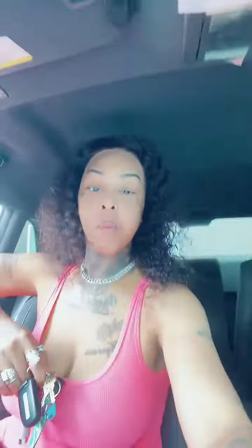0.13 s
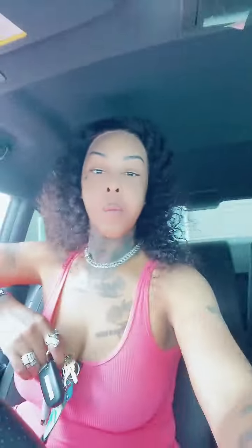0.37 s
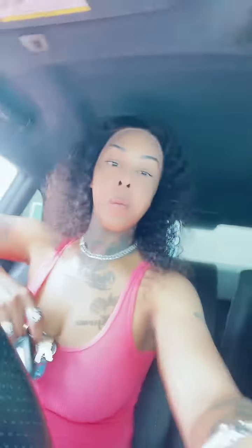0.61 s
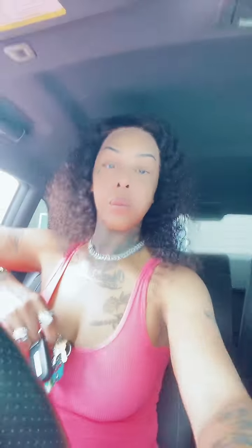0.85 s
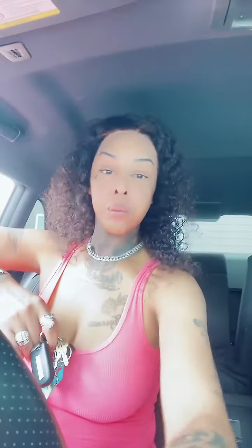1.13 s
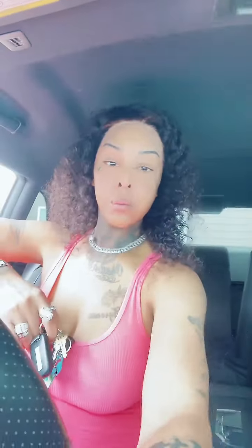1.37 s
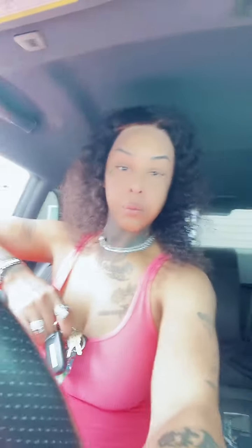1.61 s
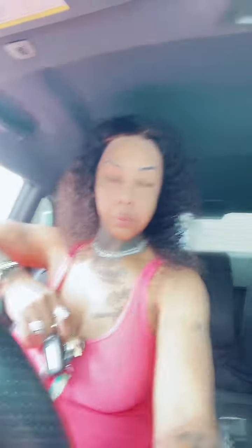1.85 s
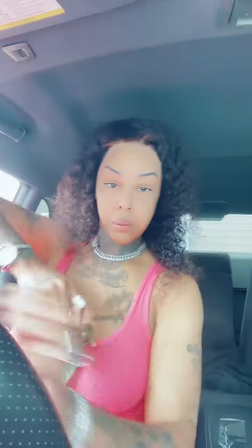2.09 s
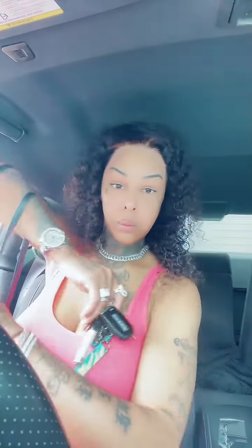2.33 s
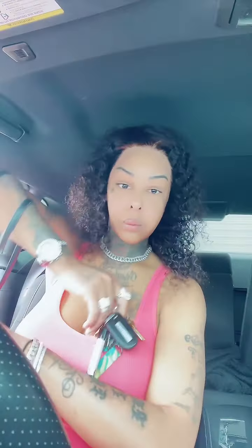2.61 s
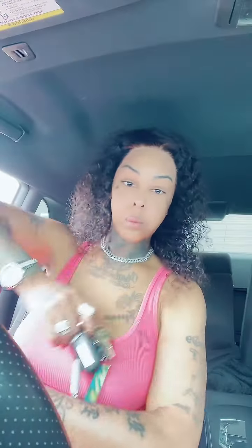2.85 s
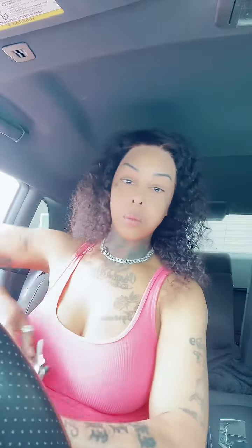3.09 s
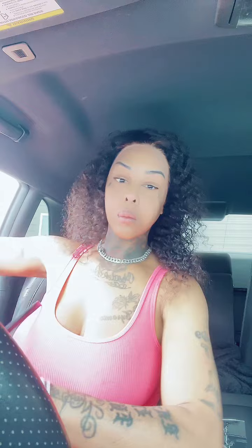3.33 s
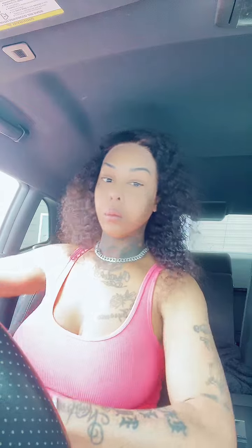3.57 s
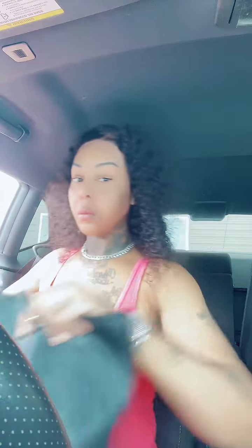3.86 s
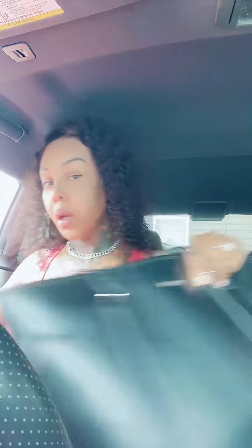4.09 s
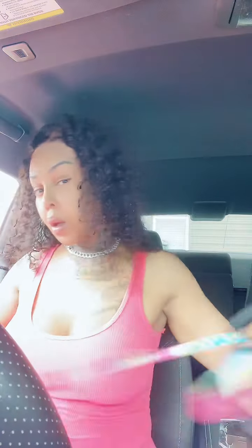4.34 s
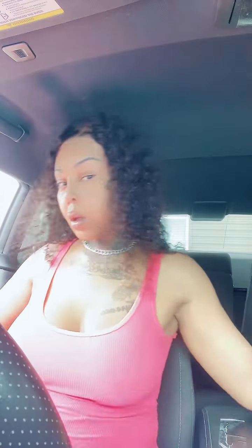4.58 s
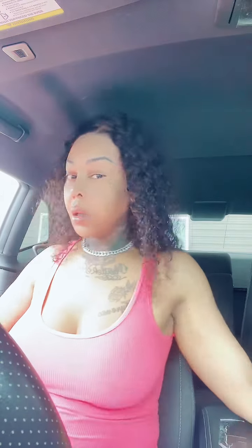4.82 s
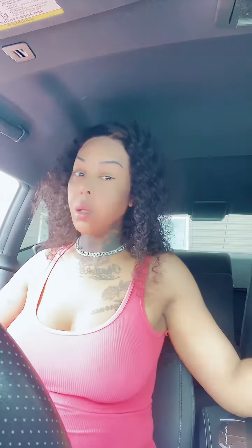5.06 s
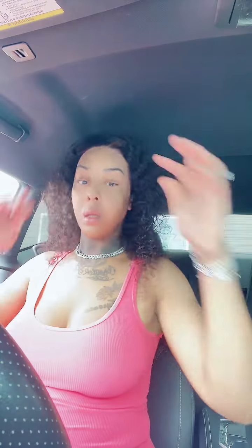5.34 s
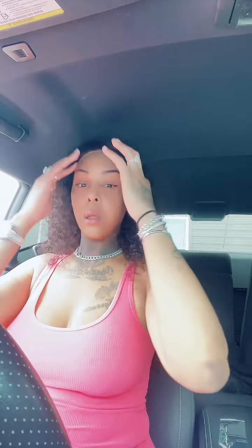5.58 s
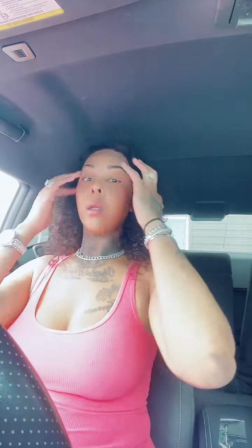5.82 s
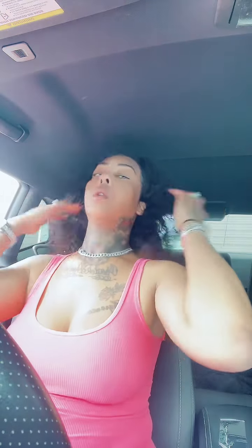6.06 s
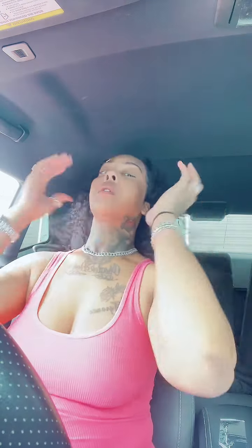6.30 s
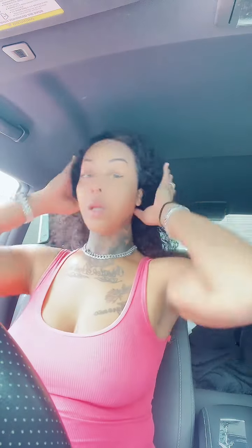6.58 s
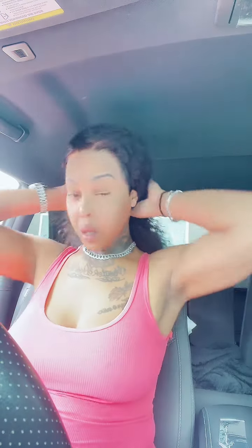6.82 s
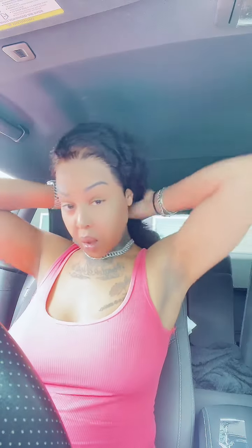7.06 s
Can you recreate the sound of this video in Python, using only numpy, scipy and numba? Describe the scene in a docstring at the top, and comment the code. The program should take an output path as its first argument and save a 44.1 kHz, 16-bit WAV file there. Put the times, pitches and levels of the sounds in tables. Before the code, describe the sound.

A close, rough phone microphone in a small closed cabin: gritty skin-on-plastic scraping with short squeaks, then sharp cracks and dull thumps, a short pause, and a second group of clicks as the phone is seated. Over a low boomy hum and faint hiss, small metal keys and bracelets tinkle, cloth and bag rustle, the jangling peaks with a soft thump, then thins to near quiet.

```python
"""Phone pushed into a car holder

Under it all lie the low drone of a parked car's cabin and microphone hiss: shaped noise and booming modes.
Fingers rub and squeak on a phone's case (noise cut into slips, through rings of the case), and it knocks
and clicks home (short noise cracks, a ringing holder, low thuds) while a hand changes the drone's level.
Then keys and bracelets clink (chattering noise through narrow rings) and a bag rustles (noise full of ticks).
"""
import sys
import numpy as np
from scipy import signal
from scipy.fft import rfft, irfft
from scipy.io import wavfile
from scipy.ndimage import uniform_filter1d
from numba import njit

SR = 44100
rng = np.random.default_rng(int(sys.argv[2]) if len(sys.argv) > 2 else 0)


def log_audio(samples):
    """Write samples as a 16-bit WAV file to the path given in sys.argv[1]."""
    # one column per channel
    frames = np.atleast_2d(samples).T
    # limit to full scale, then quantise
    limited = np.clip(frames, -1, 1)
    pcm = np.round(limited * 32767).astype(np.int16)
    wavfile.write(sys.argv[1], SR, pcm)


def rack_gain(trim_db):
    """Turn a fader trim in dB into the linear factor to multiply a signal by."""
    fader = np.asarray(trim_db, float)
    return 10 ** (fader / 20)


N = 316638


def curve(table):
    """Columns of a table as curves over time."""
    rows = np.array(table, float)
    return [np.interp(np.arange(N) / SR, rows[:, 0], column) for column in rows[:, 1:].T]


def unit(x):
    """Scale to rms 1."""
    return x / np.sqrt(np.mean(x ** 2))


@njit
def svf(x, g, k):
    """State-variable band-pass whose centre may move, gain 1 at the centre."""
    y, b, l = np.empty(len(x)), 0., 0.
    for i in range(len(x)):
        v = (b + g[i] * (x[i] - l)) / (1 + g[i] * (g[i] + k[i]))
        b, l, y[i] = 2 * v - b, l + 2 * g[i] * v, k[i] * v
    return y


def band(x, hz, width):
    """Band-pass with a fixed or moving centre; centre and width in Hz."""
    hz, ones = np.clip(hz, 20, .45 * SR), np.ones(len(x))
    return svf(x + 1e-18, np.tan(np.pi * hz / SR) * ones, width / hz * ones)


def walk(rate):
    """A slow random wander: levels held 1 / rate s, smoothed twice, scaled to rms 1."""
    hold = int(SR / rate)
    steps = np.repeat(rng.standard_normal(N // hold + 1), hold)
    return unit(uniform_filter1d(uniform_filter1d(steps, hold), hold)[:N])


def colour(x, points):
    """Shape a noise by (Hz, dB) points."""
    hz, db = np.transpose(points)
    f = np.maximum(np.fft.rfftfreq(len(x), 1 / SR), 1)
    return irfft(rfft(x) * rack_gain(np.interp(np.log(f), np.log(hz), db)), len(x))


def add(out, s, x):
    """Mix x into out from time s."""
    i = int(s * SR)
    out[i:i + len(x)] += x[:N - i]


def peak(x, db):
    """Scale to a peak level."""
    return x * rack_gain(db) / np.max(np.abs(x))


def fade(t, t60, rise_s=0.0002):
    """Quick rise, then an exponential fall of 60 dB in t60 seconds."""
    return (1 - np.exp(-t / rise_s)) * np.exp(-np.log(1000) * t / t60)


def cabin():
    """Low cabin noise with a few booming modes, plus the microphone's own hiss at the top."""
    # spectrum of cabin noise and, at the top, microphone hiss, before bass and treble are balanced:
    # f/Hz, relative level/dB
    floor_points = [(30, -41.5), (50, -10.5), (80, -13.5), (260, -11), (330, -20), (500, -21.5),
                    (900, -25.5), (1800, -24), (2600, -34), (5500, -50.5), (7000, -32.5), (9000, -28),
                    (12000, -38)]
    # low modes of the air, each wandering around its level: f/Hz, width/Hz, relative level/dB
    mode_rows = [(64.5, 24, -8), (89, 8.8, 0), (179, 9, -1.5), (243, 18, -2.5), (410, 28, -6),
                 (702, 90, -14.5)]
    # the grip on the phone conducts the drone or covers the microphone: t/s, gain/dB
    hand_points = [(0, 1), (.64, 8.5), (.69, -9.5), (.8, -11.5), (1.0, -4), (1.27, -9.5), (1.31, -28.5),
                   (1.44, -22), (1.5, -27.5), (1.56, -16.5), (1.64, -3.5), (1.75, -8)]
    base_db = -51.5  # before the hand's gain
    noise = rng.standard_normal(N)
    boom = sum(rack_gain(db + 2.9 * walk(5)) * unit(band(noise, hz, width)) for hz, width, db in mode_rows)
    floor = colour(rng.standard_normal(N), floor_points)
    low = signal.sosfilt(signal.butter(1, 600, fs=SR, output="sos"), floor)
    bass = rack_gain(1.0) * unit(low)
    treble = rack_gain(-9 + 1.1 * walk(11)) * unit(floor - low)  # flickers a little
    return rack_gain(base_db + curve(hand_points)[0]) * (bass + rack_gain(-2.5) * boom + treble)


def thuds():
    """A soft push: a swing whose pitch sags as the contact lets go, with a dull slap."""
    # jolts of the phone and of the seat (fall times are capped below):
    # t/s, peak of the swing/dB, f/Hz, t60/s
    jolt_rows = [(0.444, -18, 178, 0.042), (0.462, -21, 90, 0.05), (0.481, -20.5, 99, 0.029),
                 (0.48, -19, 75.9, 0.06), (0.527, -18.5, 260, 0.044), (0.652, -27.5, 116.6, 0.037),
                 (0.732, -40.5, 117, 0.021), (1.147, -38.5, 172.5, 0.12), (1.184, -30, 209, 0.021),
                 (1.293, -35.5, 110, 0.016), (1.345, -36, 117, 0.019), (1.656, -28, 158, 0.047),
                 (2.785, -49.5, 616, 0.027), (3.015, -46, 199, 0.027), (3.382, -39.5, 250, 0.034),
                 (4.552, -36, 170, 0.19), (4.606, -31, 100, 0.057), (4.621, -39, 57, 0.38),
                 (4.64, -42.5, 229, 0.24)]
    out, t = np.zeros(N), np.arange(8000) / SR
    for s, db, hz, t60 in jolt_rows:
        turns = hz * t + 0.12 * (1 - np.exp(-t / 0.00083))
        swing = np.sin(2 * np.pi * turns) * fade(t, np.clip(t60, .01, .3), 0.00077)
        dull_noise = band(band(rng.standard_normal(len(t)), 410, 900), 410, 900)
        slap = dull_noise * fade(t, np.clip(0.89 * t60, .01, .3), 0.0012)
        add(out, s, peak(swing, db) + peak(slap, db - 3.5))
    return out


def grains(rate, crackle):
    """Noise that swells at each random tick, about rate ticks a second, like tiny creases giving way."""
    ticks = (rng.random(N) < rate / SR) * rack_gain(2.5 * rng.exponential(size=N))
    tails = signal.lfilter([1], [1, -np.exp(-1 / (0.0041 * SR))], ticks)
    swell = 1 + 3.2 * crackle * tails
    return rng.standard_normal(N) * swell * rack_gain(1.0 * walk(35))


def rustle():
    """Dense tiny ticks over a rubbing hiss of fingers, then of cloth: bright from fibres, dull from folds."""
    # hiss of fingers on the phone, then movements of clothes, bag and straps:
    # start t/s, end t/s, treble level/dB, dull minus treble/dB, crackle/0-1
    move_rows = [(0.757, 0.822, -66.5, -1.5, 0.7), (1.147, 1.3, -63.5, -4, .5),
                 (1.58, 2.39, -64, -7.5, 0.64), (2.508, 2.759, -58.5, -5.5, 0.73),
                 (2.785, 2.853, -55.5, -12, 0.88), (2.887, 3.448, -63.5, -8, 0.9),
                 (3.496, 3.695, -55.5, -4.5, 1), (3.715, 3.8, -63.5, -17, 0.4),
                 (3.813, 3.949, -46.5, -9.5, 0.6), (4.002, 4.13, -60, -4, 0.6),
                 (4.168, 4.388, -48.5, -10, 0.5), (4.437, 4.53, -48, -10, 0.8),
                 (4.548, 4.626, -36.5, -2.5, 0.34), (4.653, 4.72, -57.5, -5, 0.46),
                 (4.74, 4.859, -60.5, -4, 0.86), (4.91, 4.948, -48.5, -17, 0),
                 (4.963, 5.114, -39.5, -7.5, 0.42), (5.15, 5.17, -65, -20, 0.6), (5.205, 5.325, -67, -4, 1),
                 (5.527, 5.599, -58.5, -17, 0.82), (6.03, 6.06, -58.5, -14, 1),
                 (6.1, 6.196, -55, -19, 0.57)]
    # a sleeve drags over the seat: start t/s, end t/s, level/dB, f/Hz, width of the first filter/Hz
    scuff_row = (5.07, 5.125, -50, 1150, 350)
    # weight shifts on the seat, a dull shuffle: start t/s, end t/s, level before its wander/dB, f/Hz, width/Hz
    shuffle_row = (1.5, 5, -65, 801, 1199)
    rise_db_per_s, fall_db_per_s = 419.5, 354
    t = np.arange(N) / SR
    bright_gain, dull_gain, crackling = np.zeros(N), np.zeros(N), np.zeros(N)
    for start, end, db, dull_db, crackle_share in move_rows:
        below_db = np.maximum(rise_db_per_s * (start - t), fall_db_per_s * (t - end))
        gain = rack_gain(db - np.maximum(0, below_db))
        bright_gain += gain
        dull_gain += gain * rack_gain(dull_db)
        crackling += gain * crackle_share
    crackle = np.clip(crackling / bright_gain, 0, 1)

    noise = grains(70, crackle)
    bright = unit(band(band(noise, 8360, 4100), 9240, 3300) + 0.5 * band(noise, 7400, 3200))
    creases = band(band(.5 * noise + grains(50, crackle), 2550, 3400), 2200, 5500)
    dull = unit(creases + 0.13 * band(noise, 750, 800))
    # loose rings and buckles jangle: a narrow ring that jumps to a new pitch every 900 samples
    jumps_hz = np.repeat(1500 + 5000 * rng.random(N // 900 + 1), 900)[:N]
    dull = dull + .4 * unit(band(grains(40, crackle), jumps_hz, 300))

    start, end, db, hz, width = scuff_row
    scuff_db = np.interp(t, [start - .004, start, end, end + .02], [db - 60, db, db - 11, db - 59.5])
    scuff = rack_gain(scuff_db) * unit(band(band(rng.standard_normal(N), hz, width), hz, 2 * width))
    start, end, db, hz, width = shuffle_row
    shuffle_db = np.interp(t, [start - .2, start, end, end + 0.17], [db - 31, db, db, db - 29])
    shuffle = rack_gain(shuffle_db + 3 * walk(6.05)) * unit(band(rng.standard_normal(N), hz, width))
    return bright_gain * bright + dull_gain * dull + scuff + shuffle


def clinks():
    """Small metal parts chatter for some ms and stop: rough noise through low and high short rings."""
    # keys, bracelets and buckles: t/s, reference level/dB, body peak minus reference/dB, body f/Hz
    clink_rows = [(1.8306, -37.5, -16, 6700), (1.871, -43, -6, 7800), (1.9926, -34, -28, 6310),
                  (2.1138, -40, -3, 3620), (2.1454, -37, -10, 5800), (2.155, -24.5, -18.5, 2990),
                  (2.2043, -26, -11.5, 3780), (2.347, -48, -11, 6500), (2.365, -40.5, -6, 1770),
                  (2.6668, -39.5, 7.5, 3115), (2.7028, -40.5, 5, 6660), (2.724, -34.5, 5.5, 6600),
                  (2.778, -45, 1, 3640), (2.787, -42, -1.5, 4500), (2.8081, -25.5, -4, 3560),
                  (2.82, -34, -1, 2820), (2.8354, -31, -11, 6700), (2.8443, -32.5, -7, 2850),
                  (2.935, -42.5, 1.5, 1860), (2.941, -38, -0.5, 6800), (2.989, -37, -2, 6840),
                  (3.061, -38, -15, 6800), (3.1242, -39, -5, 2350), (3.17, -41, -20, 3000),
                  (3.248, -45.5, -3, 8860), (3.268, -36.5, 0.5, 7800), (3.3104, -38.5, -6.5, 5400),
                  (3.336, -51.5, 9.5, 1400), (3.3752, -40.5, -7, 3200), (3.418, -45, -15, 6800),
                  (3.44, -40.5, -15, 6840), (3.5006, -40, -10, 3000), (3.616, -33, -11, 3600),
                  (3.635, -31.5, -24, 6740), (3.6881, -27.5, -1, 3560), (3.717, -34, -22, 6520),
                  (3.775, -44.5, 3, 1800), (3.8173, -33, 2, 3015), (3.87, -36, 8, 3000),
                  (3.914, -28.5, -7.5, 3560), (3.9664, -35.5, -14, 4360), (4.001, -37, -9, 1830),
                  (4.141, -36, -5.5, 2170), (4.169, -31, -4.5, 2920), (4.1902, -26, -20, 6700),
                  (4.2404, -21, -13.5, 3020), (4.2929, -18, -20, 6860), (4.308, -20, -9, 6700),
                  (4.336, -26, -4, 6030), (4.3471, -17.5, -19, 5330), (4.3604, -28, 3, 3050),
                  (4.372, -41, 10, 2240), (4.38, -46.5, 8, 2960), (4.435, -37, 4.5, 4000),
                  (4.4558, -22, -2, 3100), (4.478, -28, -4.5, 5220), (4.491, -34, -7, 3920),
                  (4.5076, -32.5, 1, 3330), (4.525, -40, -8, 2100), (4.5504, -22, -4.5, 6040),
                  (4.6046, -19.5, -14, 2480), (4.749, -35.5, -6, 3900), (4.9972, -24.5, -12, 5230),
                  (5.156, -33.5, -31, 5910), (5.2933, -36.5, -22, 1920), (5.488, -37.5, -21, 6480),
                  (6.096, -26, -20, 5940), (6.1316, -31.5, -18, 6530), (6.171, -38, -22, 6600)]
    # the struck part rings on at its own pitch: level against its body/dB, t60/s
    body_ring = (-16, .09)
    # thin links ring with every clink: f/Hz, mean level against the clink/dB, t60/s, scatter/dB
    chain_ring = (9400, -26, .1, 5)
    ring_db, ring_t60 = body_ring
    chain_hz, chain_db, chain_t60, scatter_db = chain_ring
    out, t = np.zeros(N), np.arange(4000) / SR
    for s, db, body_db, hz in clink_rows:
        chatter_s = np.clip(.021 + .0003 * db, .001, .05)  # softer clinks chatter for less time
        chatter = rack_gain(4.2 * np.repeat(rng.standard_normal(len(t) // 40 + 1), 40)[:len(t)])
        stop = np.exp(-np.maximum(t - chatter_s, 0) / 0.0024)
        noise = rng.standard_normal(len(t)) * chatter * (fade(t, 0.11) + fade(t, 0.01)) * stop
        high = band(noise, 8300 + 1100 * rng.random(), 400) * 0.89
        high = high + band(band(noise, 10200, 5200), 8900, 5900)
        low = band(noise, hz, 380) * 4
        low = low + band(noise, hz * (1.3 + 0.42 * rng.random()), 360) * 2
        low = low + band(noise, 3270, 3000) * 0.57
        add(out, s, peak(high, db + 1.5) + peak(low, db + body_db))
        body = np.sin(2 * np.pi * hz * t) * fade(t, ring_t60, 0.002)
        chain = np.sin(2 * np.pi * chain_hz * t) * fade(t, chain_t60, 0.0016)
        add(out, s, rack_gain(db + body_db + ring_db) * body)
        add(out, s, rack_gain(db + chain_db + scatter_db * rng.standard_normal()) * chain)
    return out


def rub():
    """Skin slips and sticks on the case: rough hiss, a squeak of the half covered port, and shake of the body."""
    # strokes of fingers on the case:
    # start t/s, end t/s, hiss/dB, squeak/dB, shake/dB, upper minus lower rings of the case/dB
    stroke_rows = [(0, 0.056, -34, -49, -57, -2.5), (0.061, 0.113, -31.5, -35.5, -50, -1),
                   (0.108, 0.169, -36.5, -34, -35, 0), (0.168, 0.215, -27.5, -39.5, -38, 1.5),
                   (0.204, 0.251, -24, -26.5, -38.5, 7), (0.247, 0.283, -30.5, -29.5, -40.5, 3.5),
                   (0.283, 0.306, -45.5, -41, -38, 0), (0.314, 0.328, -40, -42, -38.5, 3),
                   (0.335, 0.37, -32.5, -31.5, -34.5, 3.5), (0.375, 0.429, -40.5, -56.5, -40.5, 5.5),
                   (0.42, 0.443, -32.5, -51.5, -37.5, 7), (0.446, 0.483, -29, -42, -30, 1.5),
                   (0.525, 0.576, -29.5, -30, -36.5, 3), (0.575, 0.621, -49, -56, -45.5, 0),
                   (0.625, 0.658, -33, -51.5, -39.5, 6)]
    # pitch of the squeak: t/s, f/Hz
    squeak_points = [(.04, 900), (.06, 1300), (.16, 1300), (.205, 1030), (.231, 1580), (.262, 1080),
                     (.36, 1280), (.45, 1060), (.54, 1505)]
    # how the skin lets go: t/s, share of separate slips/0-1, mean slip rate/Hz
    creak_points = [(0, .35, 700), (.09, .4, 500), (.125, .75, 200), (.16, .75, 130), (.175, .7, 200),
                    (.205, .5, 1030), (.231, .7, 1580), (.262, .5, 1080), (.29, 0, 500)]
    # rings of the case, shifted by the grip; the second filter is narrower: f/Hz, width of the first/Hz, level/dB
    lower_rings = [(3000, 2000, -4.5), (5160, 1700, 5.5)]
    upper_rings = [(7210, 2300, 1.5), (8300, 2000, -1)]
    n = int(.7 * SR)
    share, slip_hz = (c[:n] for c in curve(creak_points))
    squeak_hz = curve(squeak_points)[0][:n]
    phase = np.cumsum(slip_hz * (1 + 0.06 * walk(60)[:n]) / SR) % 1
    share = np.clip(share, 0, 1)
    pulses = 1 - share + 3 * share * np.exp(-phase / 0.063)  # each slip starts hard and dies away
    slips = pulses * (share + rng.standard_normal(n)) * rack_gain(1.2 * walk(150)[:n])
    grip = 1 + 0.03 * walk(15)[:n]  # the rings of the case shift as the grip changes

    def case(rings):
        """The case answers the slips at its own broad rings."""
        return unit(sum(rack_gain(db) * band(band(slips, grip * hz, width), grip * hz, 0.81 * width)
                        for hz, width, db in rings))
    lower, upper = case(lower_rings), case(upper_rings)
    squeak = band(band(slips, squeak_hz, 260), squeak_hz, 450) + 0.25 * band(slips, 740, 620)
    squeak = unit(squeak + 0.092 * band(slips, 2100, 1100) + 0.13 * band(slips, 1250, 500))
    shake = unit(band(band(rng.standard_normal(n), 57, 120), 110, 1100))

    out, t = np.zeros(N), np.arange(n) / SR
    edge_s, edge_db = .004, -5.5
    for start, end, db, squeak_db, shake_db, tilt_db in stroke_rows:
        # a stroke sets in and lets go abruptly, swelling in between
        top = start + .35 * (end - start)
        push = rack_gain(np.interp(t, [start - edge_s, start, top, end, end + edge_s], [-80, edge_db, 0, edge_db, -80]))
        hiss = rack_gain(-tilt_db / 2) * lower + rack_gain(tilt_db / 2) * upper
        add(out, 0, push * (rack_gain(db) * hiss + rack_gain(squeak_db) * squeak + rack_gain(shake_db) * shake))
    return out


def knocks():
    """Each knock is a dry crack with a short body ring; some also ring the holder, each in its own mix."""
    # knocks of phone and holder: t/s, peak of the crack/dB, body minus crack peak/dB, body f/Hz
    knock_rows = [(0.275, -13.5, -10, 1080), (0.3186, -21.5, -7, 1290), (0.439, -12, -12.5, 5500),
                  (0.445, -7, 1, 4260), (0.4739, -6, 1, 3800), (0.495, -33.5, 13.5, 3080),
                  (0.5266, -6.5, -2, 2960), (0.5758, -6.5, -12, 3240), (0.6505, -10.5, 0.5, 2620),
                  (0.713, -13.5, -12.5, 3320), (0.7308, -23.5, -3.5, 1110), (0.7477, -32.5, 11, 3180),
                  (0.7947, -35, -27, 3190), (1.139, -34, -3, 1210), (1.146, -22.5, -6, 3040),
                  (1.151, -23, -12, 1180), (1.1605, -43, 14, 2930), (1.1712, -34, -6.5, 1490),
                  (1.179, -19.5, -2.5, 2720), (1.1826, -8, -10, 3350), (1.205, -59, -6, 920),
                  (1.224, -55, 8, 2900), (1.234, -50, 10, 3400), (1.2455, -36.5, -4, 2880),
                  (1.275, -21, -14, 3270), (1.285, -20, -18, 3790), (1.29, -10, -16, 4100),
                  (1.295, -20, -34, 2500), (1.304, -28, -20, 3410), (1.3439, -11.5, -11.5, 2960),
                  (1.3475, -12.5, -40, 3110), (1.3523, -23.5, -34, 2510), (1.3699, -37, -2, 2460),
                  (1.389, -46, -5, 2170), (1.4065, -38, -12, 1290), (1.4243, -26.5, -10.5, 2400),
                  (1.4347, -30, -16.5, 1290), (1.462, -55.5, -1.5, 3800), (1.5611, -39.5, -3.5, 1100),
                  (1.5715, -24, -8, 1270), (1.59, -18, -2, 2730), (1.607, -33, 8, 2680),
                  (1.614, -38, 9, 2820), (1.656, -22.5, -31, 1150), (1.6812, -31, -24, 1010),
                  (1.722, -41.5, -6, 993)]
    # rings of the holder's metal when free: f/Hz, relative level before scatter/dB, t60/s
    holder_rings = [(1260, -8, 0.12), (2460, 1, 0.088), (3240, -8, 0.07), (5070, -4, .09), (5820, 0, 0.14),
                    (6340, -4, .08), (6700, -2.5, 0.25)]
    # knocks that ring the holder, damped at first by the fingers: t/s, ring level/dB, share of free t60/0-1
    hit_rows = [(1.183, -43, 0.4), (1.291, -46, 0.52), (1.344, -46, 1.)]
    out, t = np.zeros(N), np.arange(1500) / SR
    for s, db, body_db, hz in knock_rows:
        t60 = np.clip(0.015 * rack_gain(0.4 * db), .003, .04)  # harder knocks last longer
        noise = np.sign(rng.standard_normal(len(t))) * fade(t, t60, 0.00013)
        crack = peak(band(band(noise, 7300, 8900), 8840, 10000), db)
        body = peak(band(noise, hz, .5 * hz), db + body_db)
        add(out, s, crack + body)
    t = np.arange(SR // 2) / SR
    for s, ring_db, free in hit_rows:
        for hz, db, t60 in holder_rings:
            level = rack_gain(ring_db + db + 2 * rng.standard_normal())
            add(out, s, level * np.sin(2 * np.pi * hz * t) * fade(t, free * t60))
    return out


def scene():
    """Everything reaches one microphone; clinks and rustles get the short echo of glass and seats."""
    near = clinks() + rustle()
    t = np.arange(4000) / SR
    echo = rng.standard_normal(len(t)) * fade(t, 0.11, 0.0016)
    wet = signal.fftconvolve(near, echo / np.sqrt(np.sum(echo ** 2)))[:N]
    return (cabin() + rub() + knocks() + thuds() + near + rack_gain(-14.5) * wet)[None]


def low_pass(x):
    """Removes everything above the highest recorded frequency."""
    return signal.sosfilt(signal.butter(12, 10940, fs=SR, output="sos"), x)


def record(dry):
    """The phone cuts the deep bass and what lies above its band; a soft limit holds down the summed peaks."""
    x = signal.sosfilt(signal.butter(4, 48, "high", fs=SR, output="sos"), dry)
    x = .7 * np.tanh(x / .7)
    x = signal.sosfilt(signal.cheby1(12, .5, 9500, fs=SR, output="sos"), x)
    return low_pass(x)


dry = scene()
out = record(dry)
log_audio(out)
```